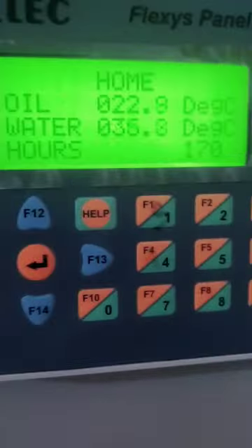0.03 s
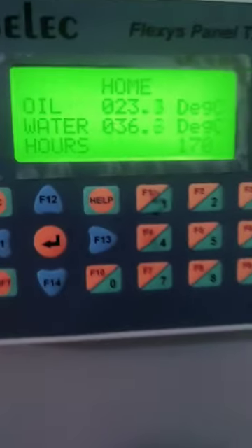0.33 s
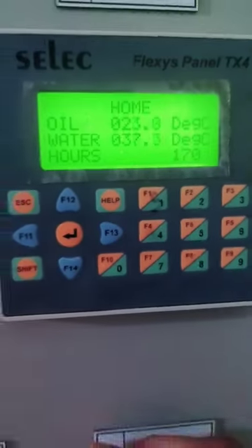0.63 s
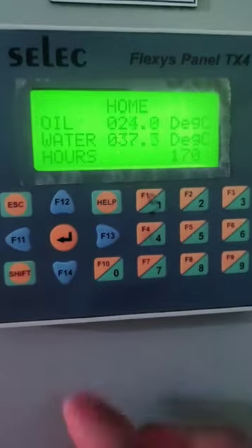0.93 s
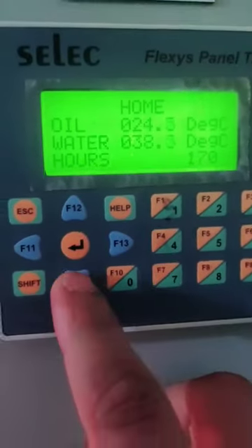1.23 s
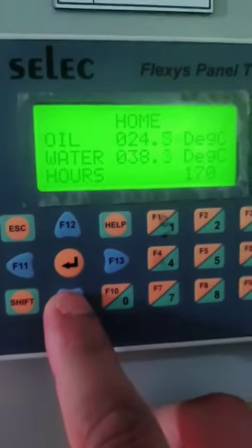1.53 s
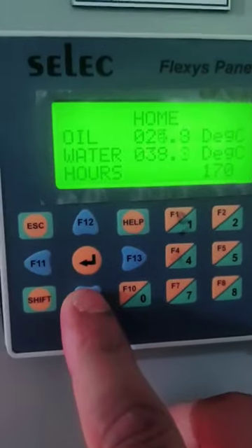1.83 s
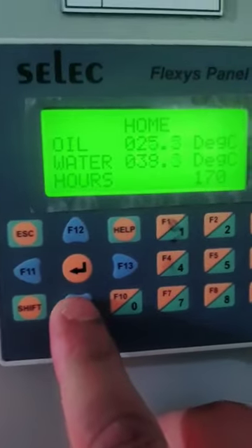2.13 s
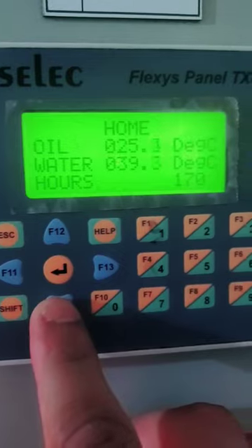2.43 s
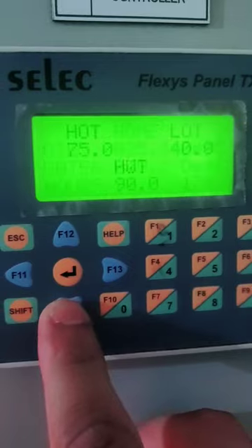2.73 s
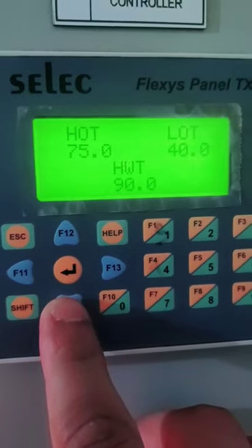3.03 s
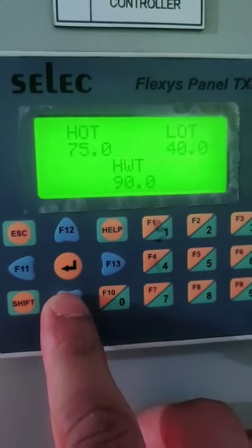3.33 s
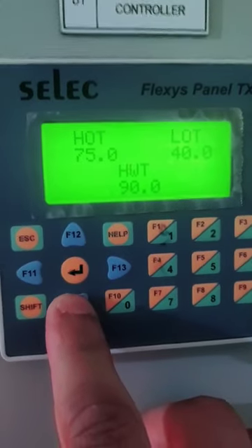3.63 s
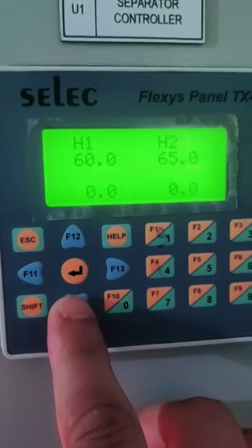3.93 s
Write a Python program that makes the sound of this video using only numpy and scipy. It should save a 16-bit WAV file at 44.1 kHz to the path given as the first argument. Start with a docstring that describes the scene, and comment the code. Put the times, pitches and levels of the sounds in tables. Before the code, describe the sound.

A steady low machine hum, with soft clothing rustles and faint handling clicks at a panel.

```python
"""In a workshop, machinery runs steadily: a rotor hums at its fundamental and harmonics over the
roar of its resonant housing. Close by at a control panel, clothing rustles by friction as a hand
comes up, with soft low swells, and a finger rubs lightly. Something scrapes twice, stick-slip
friction exciting a thin metallic ring, and handling makes a few faint clicks and plastic snaps."""
import sys
import numpy as np
from scipy.fft import rfft, irfft, next_fast_len
from scipy.io import wavfile
from scipy.ndimage import map_coordinates

SR = 44100
rng = np.random.default_rng(int(sys.argv[2]) if len(sys.argv) > 2 else 0)


def wav_record(signal):
    """Record a signal, one row per channel, as 16-bit PCM in the file named by sys.argv[1]."""
    frames = np.transpose(np.atleast_2d(signal))
    bounded = np.clip(frames, -1, 1)
    # unit amplitude maps onto the largest positive 16-bit level
    quanta = np.round(bounded * 32767).astype(np.int16)
    wavfile.write(sys.argv[1], SR, quanta)


N = 176400
TIME = np.arange(N) / SR


# Fundamental, growing as the listener nears the panel (t/s, level/dB)
FUNDAMENTAL = [(0, -47.5), (.7, -51.5), (1.3, -45.5), (1.6, -44), (1.85, -42.5), (3.2, -42.2), (4, -44.8)]
# Harmonics (number, initial level/dB, slope/(dB/s), left-right/dB, left phase lead/rad, waver/dB)
HARMONICS = [(2, -46.6, -0.6374, -3, 0.66, 0.5), (4, -70, 1.54, 7.5, 1.78, 1.5)]
def rotor(pitch_hz=248.36, drift=0.002753, flutter=0.002107, waver_db=1.37):
    """Periodic motion radiates harmonics, here with slight random frequency modulation."""
    hz = pitch_hz * (1 + drift * wobble(6) + flutter * wobble(35.097))
    phase = 2 * np.pi * np.cumsum(hz) / SR
    hum = amp(curve(FUNDAMENTAL) + waver_db * wobble(12)) * pan(db=3) * np.sin(phase)
    for number, db, slope, balance, lead, depth_db in HARMONICS:
        envelope = amp(db + slope * TIME + depth_db * wobble(14))
        hum += envelope * pan(balance) * np.sin(number * phase + np.array([[lead], [0]]))
    return np.sqrt(2) * hum


# Spectrum of the roar (f/Hz, relative density/dB)
ROAR_SPECTRUM = [(12, 1), (40, 1.62), (78, -5.5), (105, -1.5), (135, -7), (170, -2.7), (225, -4), (275, -6),
                 (335, -6), (380, -13), (440, -13.5), (550, -14), (640, -21.5), (715, -16.5), (830, -24),
                 (960, -21), (1170, -26.5), (1400, -25.5), (1750, -23.5), (2400, -32), (3100, -37),
                 (4200, -40.5), (5200, -47), (10000, -52), (15000, -61)]
# Left-right coherence of roar, housing and swells (f/Hz, correlation)
ROAR_COHERENCE = [(100, 0.98), (200, 0.979), (300, 0.904), (620, 0.655), (900, 0.142), (1400, -0.307),
                  (3000, 0.11), (12000, -0.078)]
# Housing resonances and thin machine whines (f/Hz, half-width/Hz, level/dB, left-right/dB)
HOUSING_MODES = [(33.46, 4.2, -51.5, 3), (197.9, 8.38, -46.8, 1.18), (250.6, 15.5, -53, 2),
                 (290.1, 11.9, -56.5, 2.5), (321, 9, -51.5, 1), (493.2, 37.3, -58.5, -5.5),
                 (546.6, 17.3, -59.5, -0.5)]
WHINE_BANDS = [(1219.4, 5.6, -72, 1.5), (1269.2, 5.6, -72.5, -0.5), (1633, 7.3, -68, 2.5),
               (1737.2, 9, -67.5, 1), (1940, 8.2, -77.5, 0.5), (1995.5, 11, -73.5, 5.5),
               (2269.4, 9.3, -72.5, -0.5), (2463.6, 7.4, -72, -1.5), (2849, 10, -77.5, 3)]
def machine(shadow_hz=2430, shadow_db_per_s=0.5):
    """Forced vibration roars and rings; the acoustic shadow of panel and hand slowly dims the hiss."""
    roar = amp(-38) * broadband(ROAR_SPECTRUM, ROAR_COHERENCE)
    sound = roar + resonances(HOUSING_MODES, ROAR_COHERENCE) + resonances(WHINE_BANDS, NEAR_COHERENCE)
    lows = filtered(sound, lambda hz: 1 / (1 + (hz / shadow_hz) ** 4))
    treble_gain = amp(-shadow_db_per_s * (TIME - N / SR / 2))  # unity halfway through
    return lows + (sound - lows) * treble_gain


# Friction spectrum of the scrape (f/Hz, relative density/dB)
SCRAPE_SPECTRUM = [(500, -29), (1000, -2), (1300, 2.5), (1550, -1.5), (2050, 1), (2700, -4.5), (3200, -3),
                   (3800, -2.5), (4600, -13), (6000, -14), (9000, -40), (15000, -43)]
# Metallic modes (f/Hz, half-width/Hz, weight in push 1/dB, weight in push 2/dB, left-right/dB)
METAL_MODES = [(1313.6, 25, -9, -8.5, 2.5), (1717, 13.6, -11, -17.5, 0), (1987.4, 20, -7, -5, 5),
               (2212, 13, -11, -3.5, 3), (2359, 15, -21.5, -11.5, -1.5), (2948, 28, -12, -24.5, -1),
               (3256, 17, -21.5, -12.5, 2), (3490, 18, -13.5, -15.5, -2), (3690, 46, -16, -12, 0),
               (3877, 30, -21, -11.5, 1.5), (4100, 31, -18, -17, 6)]
# Envelopes of the two pushes (t/s, level/dB)
PUSH_1 = [(1.244, -80), (1.254, -47), (1.33, -47), (1.375, -51), (1.45, -85)]
PUSH_2 = [(1.372, -84), (1.39, -47.5), (1.425, -45.5), (1.485, -47.5), (1.52, -55), (1.61, -57),
          (1.65, -66), (1.8, -83)]
def scrape(slip_hz=169.04, slip_db=1.7):
    """Stick-slip friction excites metallic modes whose weights shift with each push's contact."""
    out = np.zeros((2, N))
    hz, width, first_db, second_db, balance = np.transpose(METAL_MODES)
    for push, mode_db in ((PUSH_1, first_db), (PUSH_2, second_db)):
        friction = broadband(SCRAPE_SPECTRUM, NEAR_COHERENCE)
        ring = resonances(zip(hz, width, mode_db, balance), NEAR_COHERENCE)
        roughness = amp(slip_db * wobble(slip_hz))
        touching = (TIME > push[0][0]) & (TIME < push[-1][0])
        out += touching * amp(curve(push)) * unit((friction + ring) * roughness)
    return out


# Crisp rustles, fuller sleeve sweeps, soft finger rubs (t/s, rise/s, 20 dB decay/s, level/dB)
RUSTLE_STROKES = [(0, 0.007, 0.17, -58.5), (.05, 0.158, 3.1, -70.5), (.5, 0.0136, 0.6, -59),
                  (.532, 0.012, 0.0466, -58.5), (.588, .015, 0.18, -56), (.645, .012, 0.26, -60.5),
                  (.75, 0.07, 0.75, -64.5), (1.1, 0.123, 0.12, -61.5), (1.25, .055, .15, -60),
                  (1.593, .012, 0.324, -58.5), (1.75, 0.094, 0.38, -63), (2.06, 0.028, 0.01, -66),
                  (2.46, 0.046, 0.5, -67.5), (2.55, 0.047, 0.3, -68.5), (2.85, 0.055, 2.3, -72),
                  (3.34, 0.078, 0.49, -72)]
SLEEVE_STROKES = [(.865, 0.028, 0.36, -55.5), (.965, 0.06, 0.28, -49.2), (1.12, 0.197, 0.4956, -50),
                  (1.37, 0.024, 0.48, -65.5)]
FINGER_STROKES = [(2.07, 0.02, 0.55, -70.5), (2.4, 0.25, 0.72, -66.5)]
# Their friction spectra (f/Hz, relative density/dB)
RUSTLE_SPECTRUM = [(1000, -10), (3000, 1), (4500, 1), (7000, -2), (11000, -2), (15000, -9)]
SLEEVE_SPECTRUM = [(400, -9), (1100, -0.5), (1900, 5.5), (2800, -3), (4300, -3.5), (6000, -7), (11000, -11),
                   (15000, -22.5)]
FINGER_SPECTRUM = [(2500, -23), (3600, -9.5), (4200, 2), (4900, -9.5), (8000, -28.5)]
def rubbing(strokes, spectrum, grain_hz=600, grain_db=2):
    """Sliding friction makes broadband noise; catching fibres modulate its amplitude."""
    friction = broadband(spectrum, NEAR_COHERENCE)
    grain = amp(grain_db * wobble(grain_hz))
    return stroke_envelope(strokes) * unit(friction * grain)


# Handling contacts (t/s, level/dB, left-right/dB, T60/s)
CONTACTS = [(.5035, -57.5, 0, 0.039), (.514, -57.5, 0.5, .025), (.541, -58, 0.5, .07), (.6, -53, 0, .05),
            (.61, -54.5, 0.5, .04), (1.388, -54.5, 2.5, .05), (1.597, -48.5, 4, 0.0595),
            (3.725, -62.5, 3, 0.048), (3.82, -53, 8, 0.0177)]
# Spectrum of a contact (f/Hz, relative density/dB)
CLICK_SPECTRUM = [(1500, -14), (4500, -3), (6500, 1.5), (10000, -1.5), (15000, -7)]
def clicks():
    """A brief impact has a wide spectrum: each contact is a bright, fast-decaying noise burst."""
    envelope = sum(pan(balance) * impact(start, db, t60) for start, db, balance, t60 in CONTACTS)
    return envelope * broadband(CLICK_SPECTRUM, NEAR_COHERENCE)


# Snaps of handled plastic (t/s, f/Hz, level/dB, T60/s)
PLASTIC_SNAPS = [(.5138, 3202, -42, .013), (.6105, 4070, -42, .012)]
def snaps():
    """Damped free vibration: each snap rings a single mode."""
    return sum(impact(start, db, t60) * np.sin(2 * np.pi * hz * (TIME - start))
               for start, hz, db, t60 in PLASTIC_SNAPS)


# Movements of the hand (t/s, rise/s, 20 dB decay/s, level/dB)
HAND_STROKES = [(.3, 0.069, 0.49, -43.5), (.88, 0.101, 0.43, -40.5), (1.18, 0.077, .25, -43.5)]
# Spectrum of their swells (f/Hz, relative density/dB)
SWELL_SPECTRUM = [(15, -5.5), (35, 3), (70, -7), (120, -19), (200, -6), (290, -9), (450, -27),
                  (1000, -59.5), (3000, -90)]
def hand_swells():
    """Slow amplitude modulation of low noise gives a soft swell as the hand moves."""
    return stroke_envelope(HAND_STROKES) * broadband(SWELL_SPECTRUM, ROAR_COHERENCE)


# Stereo balance of broadband sound (f/Hz, left-right/dB)
STEREO_BALANCE = [(60, 1.34), (200, 1.13), (380, 1.5), (700, -1.5), (1290, 2.5), (2400, 3.5), (4400, 0.9),
                  (8000, 2.5), (15000, -0.5)]
# Left-right coherence of whines and nearby sounds (f/Hz, correlation)
NEAR_COHERENCE = [(700, 0.43), (1400, -0.157), (3000, 0.038), (12000, 0.01)]
def broadband(spectrum, coherence):
    """Spectral shaping sets the colour and balance of noise."""
    return noise(lambda hz: amp(along(spectrum, hz)) * pan(along(STEREO_BALANCE, hz)), coherence)


def resonances(modes, coherence):
    """A randomly driven resonator responds in a narrow band about its natural frequency."""
    return sum(amp(db) * pan(balance) * noise(lambda hz: 1 / (1 + ((hz - f0) / width) ** 2), coherence)
               for f0, width, db, balance in modes)


def noise(gain, coherence):
    """Stereo noise of rms 1; the ratio of independent mid and side parts sets the coherence."""
    hz = np.fft.rfftfreq(N, 1 / SR)
    angle = np.arccos(np.clip(along(coherence, hz), -1, 1)) / 2
    mid, side = rfft(rng.standard_normal((2, N))) * [np.cos(angle), np.sin(angle)]
    return unit(irfft(np.array([mid + side, mid - side]) * gain(hz), N))


def stroke_envelope(strokes):
    """Incoherent strokes add in power; each rises linearly and decays exponentially."""
    power = np.zeros(N)
    for start, rise, fade, db in strokes:
        attack = np.clip((TIME - start) / rise, 0, 1)
        decay = amp(db - 20 * np.maximum(TIME - start - rise, 0) / fade)
        power += (attack * decay) ** 2
    return np.sqrt(power)


def impact(start, db, t60, rise_s=0.00079):
    """Envelope of exponential damping; the finite rise keeps the peak below db."""
    age = np.maximum(TIME - start, 0)
    return amp(db - 60 * age / t60) * (1 - np.exp(-age / rise_s))


def amp(db):
    """Amplitude ratio of a level."""
    return 10 ** (np.asarray(db) / 20)


def unit(x):
    """Normalisation to rms 1."""
    return x / np.sqrt(np.mean(x ** 2) + 1e-20)


def along(points, hz):
    """Interpolation of (f/Hz, value) points on a log axis."""
    f, values = np.transpose(points)
    return np.interp(np.log(hz + 1), np.log(f + 1), values)


def curve(points):
    """Linear interpolation of (t/s, value) points."""
    return np.interp(TIME, *np.transpose(points))


def wobble(rate):
    """Smooth random modulation, rate knots a second."""
    return map_coordinates(rng.standard_normal(int(N * rate / SR) + 4), [TIME * rate])


def pan(db):
    """Amplitude panning: left and right gains for a level difference."""
    return amp(np.array([[.5], [-.5]]) * db)


def filtered(x, response):
    """Linear filtering by a frequency response."""
    size = next_fast_len(N + SR // 4)
    return irfft(rfft(x, size) * response(np.fft.rfftfreq(size, 1 / SR)), size)[..., :N]


def scene():
    """Superposition of the running machine and the handling close by."""
    clothing = rubbing(RUSTLE_STROKES, RUSTLE_SPECTRUM) + rubbing(SLEEVE_STROKES, SLEEVE_SPECTRUM)
    finger = rubbing(FINGER_STROKES, FINGER_SPECTRUM)
    swells = hand_swells()
    return rotor() + machine() + scrape() + clothing + finger + clicks() + snaps() + swells


def record(dry):
    """Band limiting: an ideal low-pass filter cuts off at 15.5 kHz."""
    return filtered(dry, lambda hz: hz < 15500)


dry = scene()
out = record(dry)
wav_record(out)
```